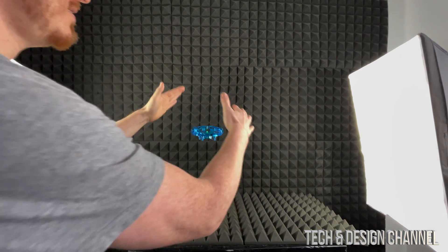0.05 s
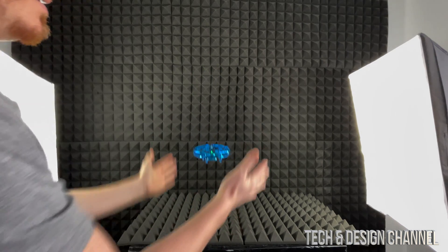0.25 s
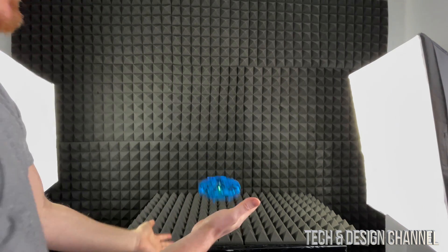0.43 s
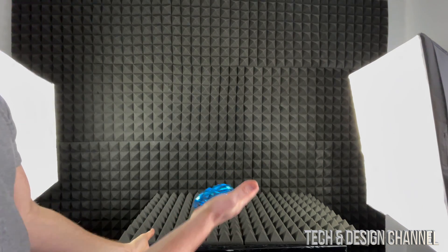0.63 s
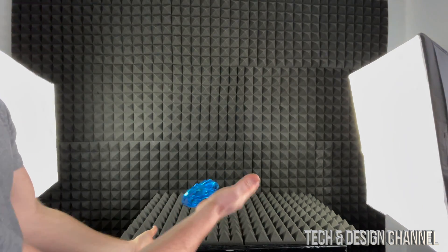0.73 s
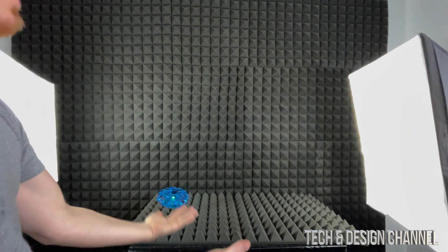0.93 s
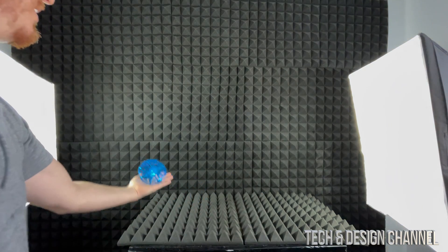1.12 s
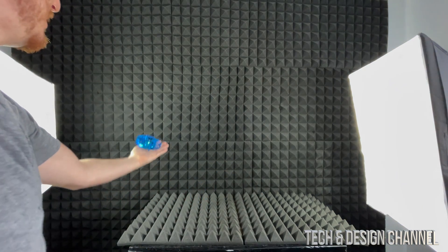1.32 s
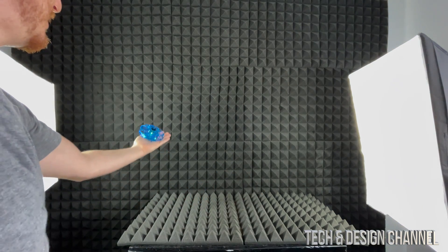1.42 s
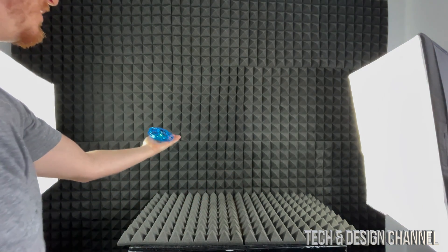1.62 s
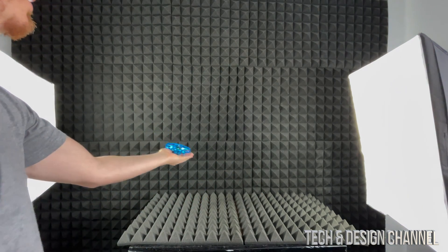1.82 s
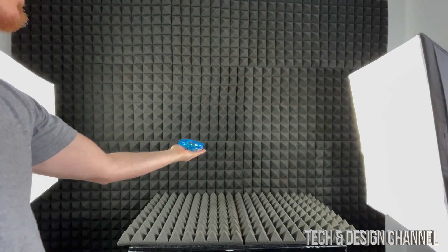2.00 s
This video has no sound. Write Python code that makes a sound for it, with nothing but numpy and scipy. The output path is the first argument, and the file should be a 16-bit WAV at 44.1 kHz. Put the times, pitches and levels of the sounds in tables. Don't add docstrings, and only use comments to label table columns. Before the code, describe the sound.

A toy drone whirs close by with a buzzing, wavering, slightly discordant whine and airy hiss; it jumps in pitch when caught, surges, then cuts and spins down with a faint scrape in a small padded room.

```python
import sys
import numpy as np
from scipy import signal
from scipy.fft import rfft, irfft, next_fast_len
from scipy.io import wavfile
from scipy.ndimage import uniform_filter1d, map_coordinates

SR = 44100
rng = np.random.default_rng(int(sys.argv[2]) if len(sys.argv) > 2 else 0)


def master(y):
    cut = np.clip(np.atleast_2d(y).T, -1, 1)
    pcm = np.round(cut * 32767)
    wavfile.write(sys.argv[1], SR, pcm.astype(np.int16))


def amplitude_ratio(level_db):
    exponent = np.asarray(level_db, float) / 20
    return 10 ** exponent


N = 90537

# time in seconds, blade-pass frequency in Hz, level in dB.
ROTOR_A = [(0, 1165, -39), (.06, 1205, -37.5), (0.102, 1161, -36.5), (0.138, 1195, -28),
           (0.199, 1168, -54.5), (0.302, 1203, -36.5), (0.359, 1247, -45.5), (0.462, 1238, -39.5),
           (.485, 1360, -41.5), (.51, 1491, -33), (.58, 1490, -29), (0.632, 1552, -27.5),
           (.72, 1524, -36.5), (.76, 1440, -40.5), (0.809, 1471, -32), (0.869, 1425, -24),
           (.93, 1465, -35.5), (.965, 1418, -23.5)]
ROTOR_B = [(.06, 1086, -35.5), (0.119, 1130, -41.5), (0.179, 1100, -42), (0.242, 1090, -42.5),
           (.29, 1150, -34.5), (0.362, 1143, -37.5), (0.421, 1167, -32), (.475, 1170, -34.5),
           (.5, 1375, -36), (.55, 1445, -29), (0.602, 1525, -39), (.685, 1515, -31.5), (.73, 1330, -29),
           (.775, 1090, -39), (.815, 1320, -31.5), (0.852, 1397, -37), (0.931, 1340, -30.5),
           (.965, 1350, -34)]
ROTOR_C = [(0, 1060, -43.5), (0.041, 1110, -37.5), (.1, 1109, -51), (.24, 1180, -26), (0.331, 1157, -52),
           (0.458, 1172, -29.5), (0.489, 1113, -35), (0.531, 891.8, -42), (.575, 1012, -58.5),
           (0.601, 950, -68.5), (.69, 950, -56), (0.718, 1054, -46), (0.782, 947.7, -46), (.82, 1003, -41),
           (.87, 1070, -36.5), (0.932, 1145, -47), (.965, 1142, -53.5)]
ROTOR_D = [(0, 1115, -44.5), (0.171, 1074, -42), (0.302, 1126, -39.5), (.45, 1200, -42), (0.511, 1000, -49),
           (0.551, 1179, -44), (.575, 1150, -41), (.6, 1146, -69.5), (0.691, 1150, -69.5),
           (0.721, 1220, -45.5), (0.758, 1250, -39), (0.799, 1200, -37), (0.858, 1296, -56),
           (0.919, 1240, -49.5), (.965, 1287, -37.5)]
# multiple of shaft speed, level in dB.
SHAFT_ORDERS = [(1, -21), (2, 0), (3, -17), (4, -7), (5, -17), (6, -12), (7, -30), (8, -16), (10, -18),
                (12, -22), (14, -23), (16, -17), (18, -27), (20, -29)]
UNBALANCE_DB = [2, -7.5, -6.5, -2.5]
DRAG = [1.2, 1.05, .95, 1.1]
# time in seconds, level in dB.
WASH_LEVEL = [
    (0.0, -30.5),
    (0.142, -32),
    (0.158, -29),
    (0.478, -25.5),
    (0.572, -34.5),
    (0.714, -32.5),
    (0.862, -22.5),
    (0.968, -23.5),
    (1.0, -30),
]
# frequency in Hz, level in dB.
WASH_SPECTRUM = [(150, -18), (600, -11), (1700, -13.5), (2600, 1.5), (5000, -3), (7500, 2), (11000, -4.5),
                 (16000, -7)]
# frequency in Hz, level in dB.
WINDAGE_SPECTRUM = [(200, -7), (900, -4), (2200, 7), (6000, -11.5), (11000, -7.5), (16000, -11.5)]
# frequency in Hz, T60 in seconds.
ROOM_T60 = [(200, .5), (1400, .4), (4000, .42), (12000, .33)]
# frequency in Hz, level in dB.
HISS_SPECTRUM = [(100, 0), (180, 0), (350, -2), (700, -9), (1400, -11), (3000, -13), (6000, -21),
                 (16000, -30)]
# frequency in Hz, level in dB.
RUMBLE_SPECTRUM = [(8, 10.5), (25, 1), (45, 0), (65, -7.5), (110, -15.5), (160, -31), (400, -32.5)]
# time in seconds, level in dB.
DRAUGHT_LEVEL = [(0.0, -61), (0.07, -41), (0.14, -65.5), (0.23, -45), (0.3, -62.5), (0.35, -53),
                 (0.45, -66), (0.46, -50.5), (0.63, -61), (0.73, -49), (0.9, -58), (0.93, -48), (1.92, -58),
                 (2.05, -53.5)]
# frequency in Hz, level in dB.
PALM_SPECTRUM = [(100, -20), (300, -4.5), (700, 3), (1300, -8), (3000, -37)]
# centre in Hz, width in Hz, level in dB.
CAN_MODES = [(2750, 800, -4), (3850, 480, -3), (3550, 1900, -1.5)]

CUT_S, COAST_S = 0.96, 0.2
SPEED_JITTER = .004
FLUTTER_DB, FLUTTER_PER_ORDER_DB, FLUTTER_MAX_DB = 2, .3, 3.5
TONE_LAW, IDLE_DB, IDLE_LAW = 12.6, -38, 3.2
BLADE_GATE = 0.36
EDDY_DB, EDDY_RATE_HZ = -2.5, 330
WASH_LAW, WINDAGE_DB, WINDAGE_LAW = 2.67, -41.5, 1.3
ROOM_DB, HISS_DB = -7.5, -68.5
PALM_DB, PALM_LAW, CATCH_S, REACH_S = -50, 1.4, 0.44, 0.027
BRUSH_DB, BRUSH_FADE_DB_PER_S, BRUSH_WAVER_DB, BRUSH_ROUGH_DB = -54, 13, .8, 1
BRUSH_LOW_CUT_HZ, STOP_S, STOP_FADE_S = 2200, 1.795, .025


def unit(x):
    return x / np.sqrt(np.mean(x ** 2) + 1e-20)


def along(points, hz):
    point_hz, values = np.transpose(points)
    return np.interp(np.log(hz + 1), np.log(point_hz + 1), values)


def curves(rows):
    time_s, *columns = np.transpose(rows)
    return [np.interp(np.arange(N) / SR, time_s, column) for column in columns]


def wobble(rate_hz):
    return map_coordinates(rng.standard_normal(2000), [np.arange(N) * rate_hz / SR])


def filtered(x, response):
    size = next_fast_len(N + SR // 2)
    spectrum = rfft(x, size) * response(np.fft.rfftfreq(size, 1 / SR))
    return irfft(spectrum, size)[..., :N]


def noise(spectrum):
    return unit(filtered(rng.standard_normal(N), lambda hz: amplitude_ratio(along(spectrum, hz))))


def coast():
    return np.exp(-np.clip(np.arange(N) / SR - CUT_S, 0, None) / COAST_S)


def shaft_tone(turn, odd_db):
    tone = 0
    for k, order_db in SHAFT_ORDERS:
        flutter_db = min(FLUTTER_DB * (k > 1) + FLUTTER_PER_ORDER_DB * k, FLUTTER_MAX_DB)
        level_db = order_db + odd_db * (k % 2) + flutter_db * wobble(55 + 12 * k)
        tone = tone + amplitude_ratio(level_db) * np.sin(k * turn + 2 * np.pi * rng.random())
    return tone


def blade_wash(turn, pass_hz):
    eddies = 0
    for k in range(1, 12):
        level = amplitude_ratio(along(WASH_SPECTRUM, k * pass_hz))
        eddies = eddies + level * wobble(EDDY_RATE_HZ * (1 + k / 10)) * np.cos(2 * k * turn)
    hiss = noise(WASH_SPECTRUM) * (1 + BLADE_GATE * np.cos(2 * turn))
    return unit(hiss) + amplitude_ratio(EDDY_DB) * unit(eddies)


def rotor(rows, odd_db, drag):
    blade_hz, level_db = curves(rows)
    speed = coast() ** drag
    jitter = SPEED_JITTER / np.maximum(speed, .2) ** 2 * wobble(80)
    shaft_hz = uniform_filter1d(blade_hz, size=400) / 2 * speed * (1 + jitter)
    turn = 2 * np.pi * (np.cumsum(shaft_hz) / SR + rng.random())
    tone = shaft_tone(turn, odd_db)
    wash = blade_wash(turn, blade_hz * speed)
    driven = coast() ** TONE_LAW
    gain = amplitude_ratio(level_db) * driven + amplitude_ratio(IDLE_DB) * (1 - driven) * speed ** IDLE_LAW
    return np.sqrt(2) * gain * tone, wash, amplitude_ratio(level_db / 2)


def rotors():
    parts = map(rotor, (ROTOR_A, ROTOR_B, ROTOR_C, ROTOR_D), UNBALANCE_DB, DRAG)
    tones, washes, shares = map(np.array, zip(*parts))
    wash = unit(np.sum(washes * shares, axis=0) / np.linalg.norm(shares, axis=0))
    wash_db, = curves([row for row in WASH_LEVEL if row[0] < CUT_S + .02])
    gust_db = wash_db - 0.94 + .5 * wobble(25) + 0.66 * wobble(90)
    windage = amplitude_ratio(WINDAGE_DB) * coast() ** WINDAGE_LAW * noise(WINDAGE_SPECTRUM)
    return sum(tones) + amplitude_ratio(gust_db) * coast() ** WASH_LAW * wash + windage


def room(x):
    hz, time_s, bins = signal.stft(rng.standard_normal(SR), SR, nperseg=256)
    decay = amplitude_ratio(-60 * time_s / along(ROOM_T60, hz)[:, None])
    tail = signal.istft(bins * decay, SR, nperseg=256)[1]
    delayed = np.pad(x, (300, 0))
    return signal.fftconvolve(delayed, tail / np.linalg.norm(tail))[:N]


def microphone_floor():
    draught_db, = curves(DRAUGHT_LEVEL)
    hiss = amplitude_ratio(HISS_DB) * noise(HISS_SPECTRUM)
    return hiss + amplitude_ratio(draught_db + 1.5 * wobble(3.1)) * noise(RUMBLE_SPECTRUM)


def palm():
    near = 1 / (1 + np.exp((CATCH_S - np.arange(N) / SR) / REACH_S))
    return amplitude_ratio(PALM_DB + 2.5 * wobble(16)) * near * coast() ** PALM_LAW * noise(PALM_SPECTRUM)


def can_response(hz):
    modes = 0
    for centre_hz, width_hz, db in CAN_MODES:
        damping = 1j * hz * width_hz
        modes = modes + amplitude_ratio(db) * damping / (centre_hz * centre_hz - hz * hz + damping)
    return modes ** 2 / (1 + (BRUSH_LOW_CUT_HZ / (hz + 1)) ** 10)


def brushes():
    t = np.arange(N) / SR
    friction = rng.standard_normal(N) * amplitude_ratio(BRUSH_ROUGH_DB * wobble(200))
    scrape = unit(filtered(friction, can_response))
    running = 1 / (1 + np.exp((t - STOP_S) / STOP_FADE_S * 2))
    level_db = BRUSH_DB - BRUSH_FADE_DB_PER_S * (t - 1.25) + BRUSH_WAVER_DB * wobble(6.5)
    return amplitude_ratio(level_db) * running * scrape


def scene():
    drone = rotors() + brushes() + palm()
    mono = drone + amplitude_ratio(ROOM_DB) * room(drone) + microphone_floor()
    return np.array([mono, mono])


def low_pass(x):
    return signal.sosfilt(signal.butter(12, 17070, fs=SR, output="sos"), x)


def record(dry):
    mix = filtered(dry, lambda hz: hz < 15750)
    return low_pass(mix)


dry = scene()
out = record(dry)
master(out)
```